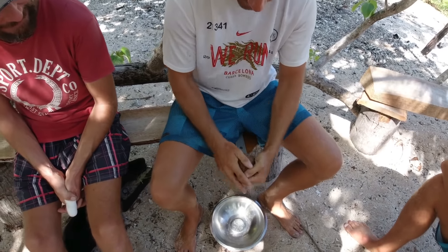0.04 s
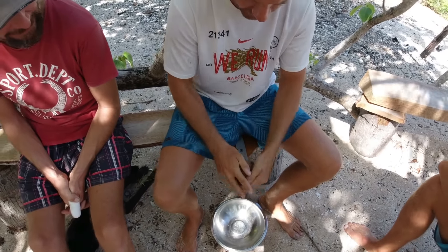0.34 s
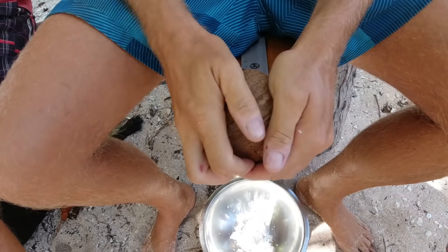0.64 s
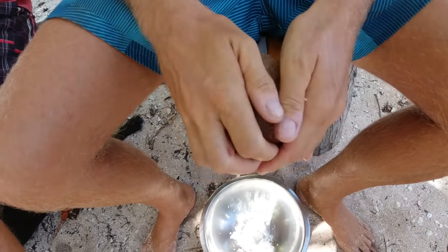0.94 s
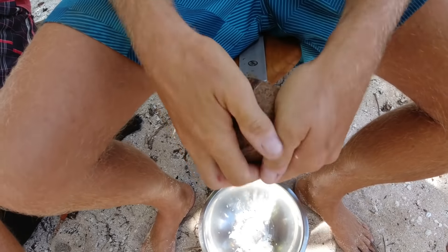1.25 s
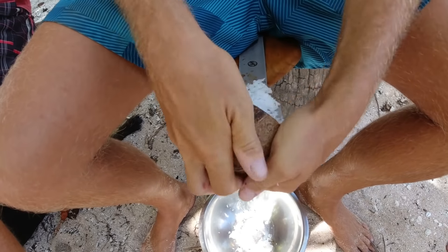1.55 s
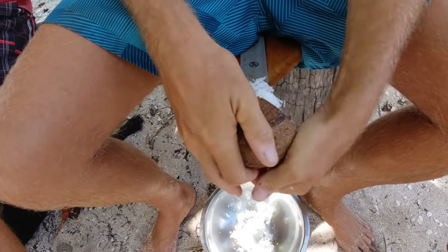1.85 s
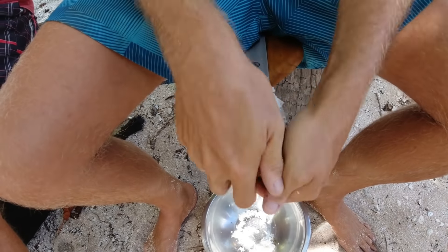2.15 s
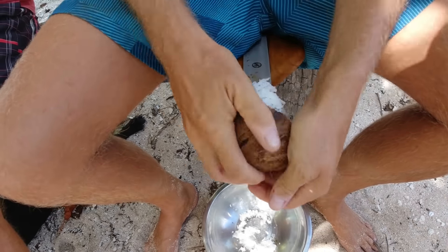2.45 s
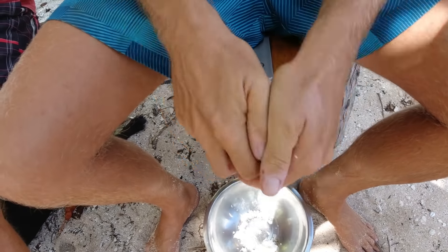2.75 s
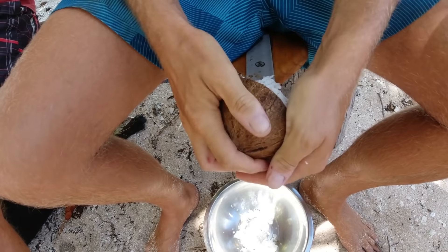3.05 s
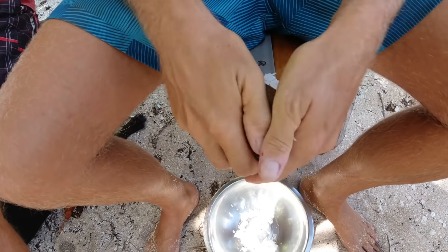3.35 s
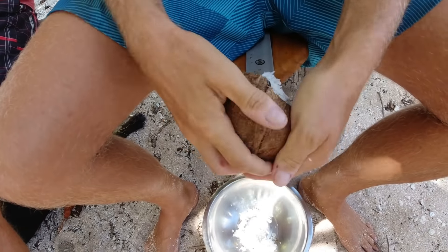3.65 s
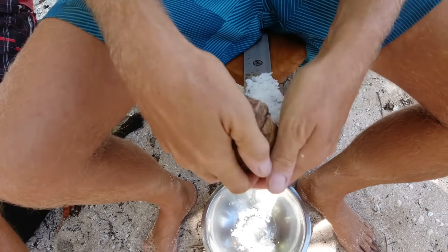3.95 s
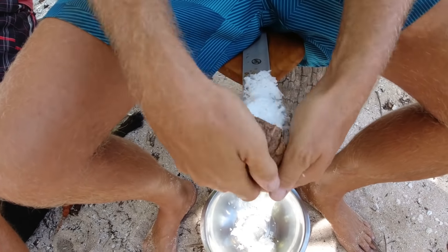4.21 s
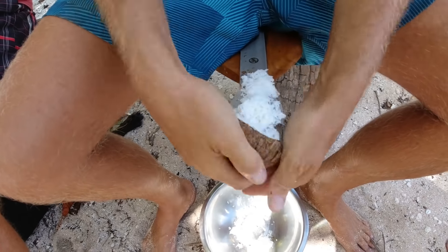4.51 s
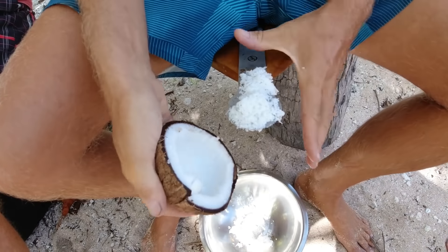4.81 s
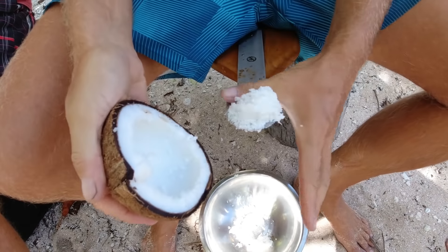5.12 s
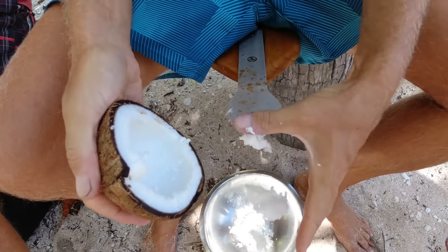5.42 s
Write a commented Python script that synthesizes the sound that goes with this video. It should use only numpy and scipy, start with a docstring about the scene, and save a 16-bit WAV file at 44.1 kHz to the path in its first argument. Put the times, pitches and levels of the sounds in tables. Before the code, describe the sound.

Half a coconut is scraped on a toothed metal grater in even, rasping strokes with hollow knocks, over a soft rumble of surf.

```python
"""Over a soft rumble of surf and air, half a coconut is scraped on the toothed blade of a stool grater.
The first strokes come from a few steps away: the teeth stick and slip through the flesh, the shell
booms, the fibres rasp and the steel rings faintly. Between strokes the shell rubs and knocks on the blade.
From 0.8 s twelve strokes, three a second, are heard from just above the hands, biting with hollow knocks.
From 2.3 s the teeth sometimes squeal; near 5 s a last bump on the stool leaves only the beach."""
import sys
import numpy as np
from scipy import signal
from scipy.fft import rfft, irfft, next_fast_len
from scipy.io import wavfile
from scipy.ndimage import uniform_filter1d

SR = 44100
rng = np.random.default_rng(int(sys.argv[2]) if len(sys.argv) > 2 else 0)


def store_wav(level_fs):
    """Save 16-bit WAV to argv[1]."""
    pcm = np.round(np.clip(np.atleast_2d(level_fs), -1, 1) * 32767)
    wavfile.write(sys.argv[1], SR, pcm.T.astype(np.int16))


N = 241473
TIME_S = np.arange(N) / SR

# Levels in the tables are relative: each layer has its own overall gain.
# Spectra of the surf's wash, its hum and the stirred air: frequency_hz, level_db
WASH_SPECTRUM = [(150, -30), (250, 6.5), (496, -10), (550, -5), (1230, -14), (2090, -17.5), (4840, -21),
                 (6710, -29), (8670, -33), (9450, -41), (15000, -44)]
HUM_SPECTRUM = [(30, -10), (70, -9.5), (105, 7), (135, 3), (190, 5), (280, -12.5), (450, -23.5),
                (1000, -68)]
AIR_SPECTRUM = [(10, -5), (28, 0), (55, -1.5), (80, -7), (130, -49), (400, -72)]
# Envelopes of the hum and of the shell's constant light rub: time_s, level_db
HUM_ENVELOPE = [(0.0, -44.5), (0.55, -44), (0.8, -40.5), (4.3, -40.5), (5.1, -43), (5.25, -37.5),
                (5.47, -46)]
RUB_ENVELOPE = [(0, -71), (2.2, -63), (3.0, -50.5), (4.65, -67.5)]
# Stereo width of beach and scraping: frequency_hz, side_minus_mid_db
BEACH_SPREAD = [(25, -3.5), (60, -8.5), (130, -21), (400, -20), (1200, -11.5), (4000, -3), (15000, -10)]
SCRAPE_SPREAD = [(100, -44), (350, -27.5), (600, -17.5), (1300, -17.5), (2400, -11), (3200, -8),
                 (4900, -12.5), (7000, -1), (8300, -12), (10000, -2.5), (16000, -0.5)]
# Distant strokes: bite_s, deepest_after_s, lift_after_s, easing_db_per_s, boom_db, rasp_db
DISTANT_STROKES = [(.001, 0.001, 0.038, 141, -18.5, -27), (.229, 0.048, .09, 44, -13, -24.5),
                   (.569, 0.009, 0.0085, 1300, -20, -26)]
# Close strokes: bite_s, deepest_after_s, lift_after_s, easing_db_per_s, boom_db, crunch_db, hiss_db,
# mode_tilt_db_per_octave, singing_re_hiss_db, bite_db, bite_pitch_hz, bounce_db, landing_db, rumble_db
CLOSE_STROKES = [(.768, 0.03, 0.096, 124, -14, -19, -25, 1.5, -15.5, 4, 354, -7, 3, -39),
                 (1.109, 0.04, 0.12, 185, -13, -22, -27, -7, -10.5, 4, 285, 0, 8.5, -41),
                 (1.474, 0.036, 0.11, 100, -15, -24, -30, -1, -8.5, -15, 325, 2, -2, -26.5),
                 (1.825, 0.031, 0.1, 276, -13, -20, -28.5, -6.5, -6, 4, 330, -13, -14, -29),
                 (2.155, 0.049, 0.1, 9, -15, -22, -28.5, -3, -5, -3, 317, -2.5, -14, -29),
                 (2.508, 0.064, 0.11, 177, -17.5, -22, -29, -1, -12, -7.5, 249, -4, -8, -40),
                 (2.841, 0.021, 0.098, 46, -11, -19.5, -28, -1.5, -5.5, -2.5, 280, -8, 5.5, -32),
                 (3.182, 0.037, 0.1, 149, -10, -16.5, -24, 0, -8, -0.5, 350, -8, -19, -39),
                 (3.5, 0.032, 0.089, 99, -11, -18, -26, 9.5, -13, -13, 543, 1.5, -10, -48),
                 (3.833, 0.0067, 0.088, 47, -14, -20.5, -24.5, 4.5, -16, -11, 548, -0.5, -28, -41),
                 (4.146, 0.078, 0.11, 69, -12, -20.5, -23, 1, -13.5, -4, 313, -14, 3.5, -37),
                 (4.5, 0.068, 0.099, 163, -14, -20, -24.5, 4.5, -16, -9, 353, -4, -16, -48)]
# Modes of the hollow shell, distant and close, and of the teeth: frequency_hz, bandwidth_hz, level_db
DISTANT_SHELL_MODES = [(232.6, 28, -7.5), (376, 51, -2), (587, 99, -3), (687, 97, -3.5), (927, 85, -12.5)]
CLOSE_SHELL_MODES = [(238.6, 55, -10), (354.7, 36, 1.5), (426.3, 55.4, -2), (546.3, 25.6, 1)]
TOOTH_MODES = [(8240, 1570, -1), (13170, 600, -10)]
# Peaks and dips that shell and blade give the rasp: frequency_hz, bandwidth_hz, gain_db
BODY_RESONANCES = [(707, 54, -17.5), (767, 81, 9.5), (942, 73, -15), (1156, 105, 7), (1330, 150, 1),
                   (1591, 45, 11), (2076, 29, -19), (2360, 930, 10), (3100, 240, 4), (3860, 99, 4.5),
                   (4460, 200, -0.5), (4840, 120, 5), (6640, 210, 6), (7230, 550, -9), (7540, 4600, 12),
                   (8900, 390, -8), (13200, 420, 4)]
# Spectra of distant and close tearing, ringing steel and light rubbing: frequency_hz, level_db
DISTANT_RASP_SPECTRUM = [(500, -20), (850, 7), (1020, 5), (1280, 7.5), (1600, -7), (1850, -0.5),
                         (2100, -9.5), (2550, -3.5), (3700, -11.5), (7200, -20), (7900, -17), (8400, -2.5),
                         (9200, -22), (15000, -34.5)]
CLOSE_RASP_SPECTRUM = [(300, 1), (680, 0), (900, 13.5), (1500, -2), (2600, -10.5), (4000, -9.5),
                       (5300, -13.5), (6200, -22), (9500, -23.5), (12000, -27.5), (16000, -25.5)]
STEEL_SPECTRUM = [(1000, -57), (2500, -40), (3600, -20), (4200, -19), (5500, -32), (7000, -4), (8200, -1.5),
                  (9000, -5), (10200, 3), (12000, -2), (13600, -4), (16000, -30)]
RUB_SPECTRUM = [(150, 10.5), (360, 19.5), (650, 1), (890, 7.5), (1300, -5.5), (2000, -8.5), (2600, -7.5),
                (3500, -3), (4200, -7), (4900, -8.5), (6700, -27.5), (8400, -9.5), (10000, -29),
                (15000, -39)]
# The shell slides back, as a rub and as a soft distant boom: centre_s, half_length_s, level_db
RETURN_RUBS = [(.137, 0.024, -40.5), (.46, 0.027, -51), (.608, 0.024, -43.5), (.722, 0.024, -38),
               (1.048, 0.0066, -45), (1.411, 0.01, -41.5), (1.712, 0.047, -41), (2.005, 0.022, -45.5),
               (2.418, 0.017, -41), (2.803, 0.021, -36.5), (3.005, 0.014, -50), (3.089, 0.009, -41.5),
               (3.39, 0.048, -46), (3.46, 0.023, -45), (3.719, .005, -45), (4.0, 0.1, -40.5),
               (4.115, 0.022, -44), (4.426, 0.0084, -39.5), (4.47, 0.044, -45.5), (4.637, 0.021, -32)]
RETURN_BOOMS = [(.124, 0.038, -28), (.478, 0.044, -33)]
# Knocks of shell on blade, and dull bumps on the stool: start_s, level_db, pitch_hz, crack_db
SHELL_KNOCKS = [(.12, -13, 596, -30), (.173, -16, 263, -48), (0.268, 4.5, 564, -23),
                (.496, -17.5, 330, -36), (.57, -5, 584, -23), (1.41, -8, 373, -29), (2.407, -18, 380, -44),
                (2.786, -24, 377, -21), (3.39, -13.5, 357, -25), (4.421, -1.5, 371, -37),
                (4.574, 2.5, 375, -12), (4.626, -4.5, 368, -10)]
STOOL_THUDS = [(1.043, 2.5, 216, -26.5), (3.084, -15, 199, -42), (3.715, -2.5, 186, -18),
               (4.421, -6, 189, -22), (4.954, -7, 194, -41)]
# Brief squeals of the teeth: centre_s, level_db, pitch_hz
TOOTH_SQUEALS = [(2.258, -25, 3570), (2.89, -26.5, 4080), (4.244, -18, 3230), (4.577, -25, 3840)]


def from_db(db):
    """Decibels to amplitude ratio."""
    return 10 ** (np.asarray(db) / 20)


def rms_one(x):
    """Normalisation to unit power."""
    return x / np.sqrt(np.mean(x ** 2) + 1e-20)


def envelope(table, fade_db_per_s=900):
    """Gain interpolated in decibels, with exponential decay outside the table."""
    times_s, levels_db = np.transpose(table)
    outside_s = np.abs(TIME_S - np.clip(TIME_S, times_s[0], times_s[-1]))
    return from_db(np.interp(TIME_S, times_s, levels_db) - fade_db_per_s * outside_s)


def swells(rows):
    """Superposed Gaussian envelopes: centre_s, half_length_s, level_db."""
    return sum(from_db(db) * np.exp(-np.minimum(((TIME_S - s) / length_s) ** 2, 100))
               for s, length_s, db in rows)


def drift(per_s):
    """Random modulation of unit power, gliding between `per_s` values a second."""
    knots = rng.standard_normal(8192)
    return rms_one(np.interp(TIME_S * per_s, np.arange(len(knots)), knots))


def coloured(x, spectrum):
    """Minimum-phase filtering: folding the cepstrum makes the response causal."""
    size = 2 * next_fast_len(N // 2 + SR // 10)
    hz, db = np.transpose(spectrum)
    outline = np.interp(np.log(np.arange(size // 2 + 1) * SR / size + 1), np.log(hz), db)
    cepstrum = irfft(np.log(from_db(outline)))
    cepstrum[1:size // 2] *= 2
    cepstrum[size // 2 + 1:] = 0
    return irfft(rfft(x, size) * np.exp(rfft(cepstrum)))[:N]


def resonance(x, hz, width_hz):
    """Damped resonator: a two-pole band-pass with unit peak gain."""
    radius = np.exp(-np.pi * width_hz / SR)
    feedback = [1, -2 * radius * np.cos(2 * np.pi * hz / SR), radius ** 2]
    return signal.lfilter(np.array([1, 0, -1]) * (1 - radius ** 2) / 2, feedback, x + 1e-18)


def ringing(x, t60_s):
    """Modal overlap: many close modes respond together as exponentially decaying noise."""
    t = np.arange(int(t60_s * SR) + 1) / SR
    tail = rng.standard_normal(2 * SR)[:len(t)] * from_db(-60 * t / t60_s)
    return signal.fftconvolve(x, tail / np.linalg.norm(tail))[:len(x)]


def evened(x, window_s):
    """Short-term power normalisation, which keeps the finer grain."""
    size = int(window_s * SR) + 1
    power = uniform_filter1d(uniform_filter1d(x * x, size), size)
    return x / np.sqrt(np.abs(power) + 1e-12)


def stereo(mid, side, spread):
    """Sum and difference: the side signal, filtered by `spread`, sets the width."""
    side = coloured(side, spread)
    return np.array([mid + side, mid - side])


def beach(delay_s=0.037, half_length_s=0.047, puff_db=-35.5, puff_follows=0.69):
    """Broadband noise: surf washes and hums; each close stroke shakes the stool and displaces air."""
    shakes = [(s + delay_s, half_length_s, db) for s, *_, db in CLOSE_STROKES]
    mean_db = np.mean([db for *_, db in shakes])
    puffs = [(s, length_s, puff_db + puff_follows * (db - mean_db)) for s, length_s, db in shakes]
    hum_gain = from_db(-1) * (envelope(HUM_ENVELOPE) + swells(shakes))
    air_gain = (from_db(-46.5) + swells(puffs)) * from_db(2.5 * drift(24))
    paths = []
    for wash_noise, hum_noise, air_noise in rng.standard_normal((2, 3, N)):
        wash = from_db(-48.5) * rms_one(coloured(wash_noise, WASH_SPECTRUM))
        hum = hum_gain * rms_one(coloured(hum_noise, HUM_SPECTRUM))
        air = air_gain * evened(coloured(air_noise, AIR_SPECTRUM), window_s=0.11)
        paths.append(wash + hum + air)
    return stereo(*paths, BEACH_SPREAD)


def pressure_db(bite_s, deepest_s, lift_s, easing_db_per_s):
    """Contact pressure of one stroke: the teeth bite, sink in, ease off and lift out."""
    attack_db_per_s, sink_db, lift_db_per_s = 1594, 6.5, 509
    t = TIME_S - bite_s
    rising = attack_db_per_s * np.minimum(t, 0) - sink_db * np.clip(1 - t / deepest_s, 0, 1)
    falling = easing_db_per_s * np.maximum(t - deepest_s, 0) + lift_db_per_s * np.maximum(t - lift_s, 0)
    tear = 2.5 / (1 + ((t - deepest_s) / 0.0092) ** 2)  # a clump of flesh comes loose
    flick = 1.4 / (1 + ((t - lift_s) / 0.011) ** 2)  # the teeth leave
    return np.maximum(rising - falling + tear + flick, -200)


def stroke_gain(strokes, column, follows=1, lag_s=0):
    """Power law: a layer's amplitude goes as contact pressure raised to `follows`."""
    return sum(from_db(row[column] + follows * pressure_db(row[0] + lag_s, *row[1:4]))
               for row in strokes)


def slips(per_s, jitter, spread_db):
    """Stick-slip friction: the teeth let go at uneven intervals and with uneven force."""
    count = np.floor(np.cumsum(per_s * np.exp(jitter * drift(300))) / SR)
    force = from_db(spread_db * np.clip(rng.standard_normal(N), -2, 2))
    return (np.diff(count, prepend=0) > 0) * force


def fibres(slip, per_s, burst_s, spread_db):
    """Shot noise: fibres snap at random, more strongly just after each slip."""
    burst = rms_one(signal.lfilter([1], [1, -np.exp(-1 / (burst_s * SR))], slip))
    snaps = (rng.random(N) < per_s / SR) * rng.choice([-1, 1], N)
    strength = from_db(spread_db * np.minimum(rng.exponential(1, N), 4))
    return rms_one(snaps * strength * (1 + burst))


def turning_nut(x, t60_s, direct_db, hop=4096):
    """Time-varying response: as the nut turns, one set of fine modes fades into another."""
    padded, out = np.pad(x, (hop, 2 * hop)), np.zeros(N + 3 * hop)
    window = np.sqrt(np.hanning(2 * hop))
    for at in range(0, N + hop, hop):
        out[at:at + 2 * hop] += window * ringing(padded[at:at + 2 * hop], t60_s)
    return out[hop:hop + N] + from_db(direct_db) * x


def shell_boom(drive, modes, tilt_db_per_octave, wander_db):
    """Forced vibration of the hollow shell; the grip shifts the weight between its modes."""
    out = np.zeros(N)
    for k, (hz, width_hz, db) in enumerate(modes):
        grip_db = tilt_db_per_octave * np.log2(hz / modes[0][0]) + wander_db * drift(9.7)
        out += (-1) ** k * resonance(drive, hz, width_hz) * from_db(db + grip_db)
    return evened(signal.sosfilt(signal.butter(2, 800, fs=SR, output="sos"), out), window_s=0.034)


def distant_rasp(grain):
    """Source and filter: tearing fibres, coloured as heard from a few steps away."""
    gain = from_db(-0.3) * stroke_gain(DISTANT_STROKES, column=5)
    return gain * evened(coloured(grain, DISTANT_RASP_SPECTRUM), window_s=0.0081)


def steel_ring(rasp):
    """Free decay: the blade's dense modes ring on after the rasp excites them."""
    return from_db(-15) * coloured(ringing(rasp, t60_s=0.47), STEEL_SPECTRUM)


def shell_rub(grain, sliding):
    """Sliding friction: the shell rubs lightly on the blade, most on its way back."""
    return from_db(6.5) * sliding * evened(coloured(grain, RUB_SPECTRUM), window_s=0.036)


def impacts(shell_cycles=14, stool_cycles=2.7, landing_after_s=0.031, landing_hz=382.4):
    """Every impact and its damping: start_s, level_db, pitch_hz, crack_db, t60_cycles."""
    rows = [(*row, shell_cycles) for row in SHELL_KNOCKS] + [(*row, stool_cycles) for row in STOOL_THUDS]
    for row in CLOSE_STROKES:  # the shell bites, bounces and lands again
        bite_s, crunch_db = row[0], row[5]
        bite_db, bite_hz, _, landing_db = row[9:13]
        rows.append((bite_s, bite_db, bite_hz, crunch_db + 6, shell_cycles))
        rows.append((bite_s + landing_after_s, landing_db, landing_hz, crunch_db, shell_cycles))
    return rows


def knocks(rise_s=0.0021, overtone_ratio=1.48, thud_hz=144, thud_t60_s=0.084, crack_t60_s=0.015):
    """Impact excitation: damped notes of shell and stool, a crack of flesh and a tick of the blade."""
    out, t = np.zeros(N + SR), np.arange(SR // 5) / SR
    soften = signal.butter(4, 4920, fs=SR, output="sos")
    onset = 1 - np.exp(-(t / rise_s) ** 2)
    for start_s, db, hz, crack_db, t60_cycles in impacts():
        phase = 2 * np.pi * hz * t
        decay = from_db(-60 * t * hz / t60_cycles)
        note = decay * (np.sin(phase) + from_db(-21) * np.sin(overtone_ratio * phase))
        thud = from_db(-22.5 - 60 * t / thud_t60_s) * np.sin(2 * np.pi * thud_hz * t)
        noise = from_db(crack_db - 60 * t / crack_t60_s) * rng.standard_normal(len(t))
        burst = signal.sosfilt(soften, noise)
        crack = resonance(burst, hz=700, width_hz=690)
        tick = from_db(-2) * resonance(burst, hz=3880, width_hz=540)
        at = round(start_s * SR)
        out[at:at + len(t)] += from_db(db) * onset * (note + thud) + crack + tick
    return out[:N]


def close_rasp(grain, wander_db=2.5, split_hz=2520, lump_db=0.77, lumps_per_s=110):
    """Resonant filtering: shell and blade colour the tearing into a lumpy crunch and a fine hiss."""
    x = coloured(grain, CLOSE_RASP_SPECTRUM)
    for hz, width_hz, db in BODY_RESONANCES:
        gain = from_db(db + wander_db * drift(5.99))
        x = x + (gain - 1) * resonance(x, hz, width_hz * from_db(-db / 2))
    bands = [signal.sosfilt(signal.butter(3, split_hz, kind, fs=SR, output="sos"), x)
             for kind in ("low", "high")]
    return [evened(band, window_s=0.025) * from_db(-lump_db * drift(lumps_per_s)) for band in bands]


def singing_teeth(grain):
    """Resonance: the teeth sing in two high bands of their own."""
    bands = sum(from_db(db) * resonance(resonance(grain, hz, width_hz), hz, width_hz)
                for hz, width_hz, db in TOOTH_MODES)
    return evened(bands, window_s=0.14)


def bounce(after_s=0.016, half_length_s=0.0047):
    """Rebound: contact changes briefly after each close bite, usually weakening."""
    return from_db(sum(bounce_db * np.exp(-((TIME_S - bite_s - after_s) / half_length_s) ** 2)
                       for bite_s, *_, bounce_db, _, _ in CLOSE_STROKES))


def squeals(tearing, width_hz=220, half_length_s=0.017):
    """Mode locking: for a moment the slipping feeds one resonance of the blade."""
    out = np.zeros(N)
    for centre_s, db, hz in TOOTH_SQUEALS:
        tone = evened(resonance(resonance(tearing, hz, width_hz), hz, width_hz), window_s=0.054)
        out += swells([(centre_s, half_length_s, db)]) * tone
    return from_db(-1.5) * out


def grating(boom_lag_s=0.0026):
    """Common excitation: one stick-slip motion drives shell, fibres and blade; the shell answers late."""
    slip = slips(per_s=170, jitter=0.65, spread_db=6)
    contact = bounce()
    close_boom_gain = from_db(1) * contact * stroke_gain(CLOSE_STROKES, column=4, lag_s=boom_lag_s)
    crunch_gain = from_db(1) * contact * stroke_gain(CLOSE_STROKES, column=5)
    hiss_gain = from_db(0.5) * contact * stroke_gain(CLOSE_STROKES, column=6, follows=0.78)
    distant_strokes = stroke_gain(DISTANT_STROKES, column=4, lag_s=boom_lag_s)
    distant_boom_gain = from_db(-1.5) * (distant_strokes + swells(RETURN_BOOMS))
    sliding = (swells(RETURN_RUBS) + envelope(RUB_ENVELOPE)) * from_db(1.37 * drift(80))
    columns = np.transpose(CLOSE_STROKES)
    deepest_s = columns[0] + columns[1]
    tilt, singing_db = [np.interp(TIME_S, deepest_s, column) for column in columns[7:9]]
    paths = []
    for scattered in (False, True):  # direct sound, then sound scattered from the sides
        tearing = fibres(slip, per_s=7000, burst_s=0.0027, spread_db=2.5)
        push = tearing if scattered else tearing + 1.07 * rms_one(slip)
        grain = turning_nut(tearing + 0.59 * push, t60_s=0.025, direct_db=-1)
        close_boom = shell_boom(push, CLOSE_SHELL_MODES, tilt, wander_db=1.5)
        distant_boom = shell_boom(grain, DISTANT_SHELL_MODES, tilt_db_per_octave=-1.5, wander_db=2.8)
        boom = distant_boom_gain * distant_boom + close_boom_gain * close_boom
        crunch, hiss = close_rasp(grain)
        hiss = hiss + from_db(singing_db) * singing_teeth(grain)
        rasp = distant_rasp(grain) + crunch_gain * crunch + hiss_gain * hiss
        paths.append(boom + rasp + steel_ring(rasp) + shell_rub(grain, sliding) + squeals(tearing))
    return stereo(*paths, SCRAPE_SPREAD)


def scene():
    """Superposition: knocks and grating straight ahead, the beach all round."""
    return knocks() + grating() + beach()


def record(dry, cutoff_hz=15750):
    """Soft saturation rounds the highest peaks; a steep low-pass removes the top treble."""
    rounded = dry / (1 + dry ** 6) ** (1 / 6)
    return signal.sosfilt(signal.ellip(10, 0.1, 80, cutoff_hz, fs=SR, output="sos"), rounded)


dry = scene()
out = record(dry)
store_wav(out)
```